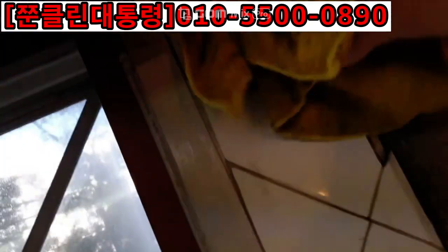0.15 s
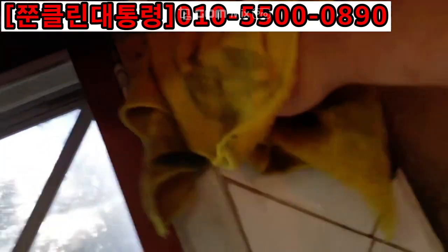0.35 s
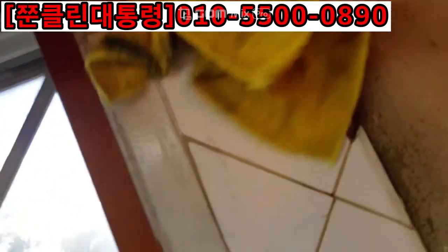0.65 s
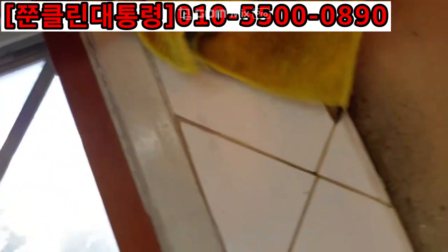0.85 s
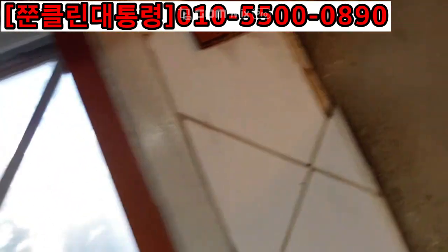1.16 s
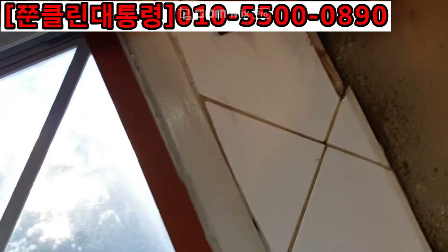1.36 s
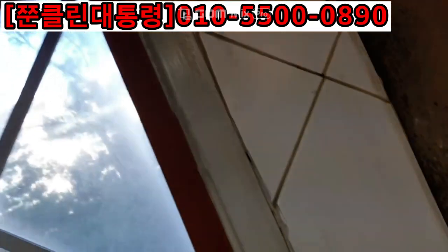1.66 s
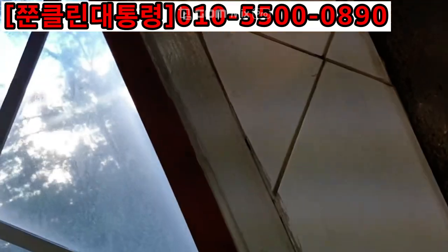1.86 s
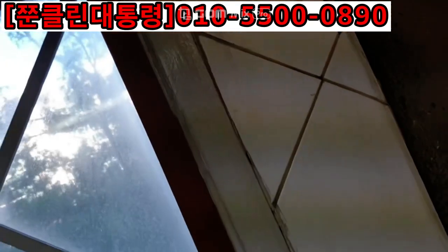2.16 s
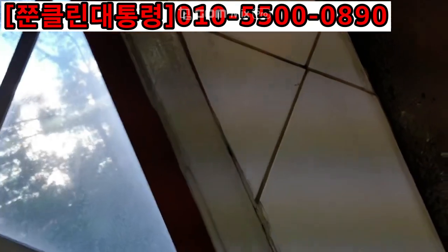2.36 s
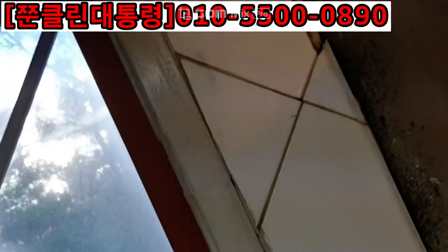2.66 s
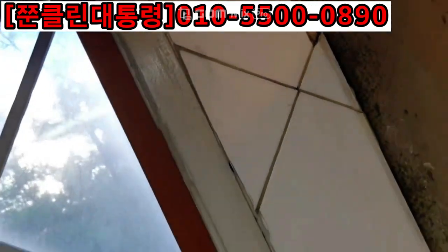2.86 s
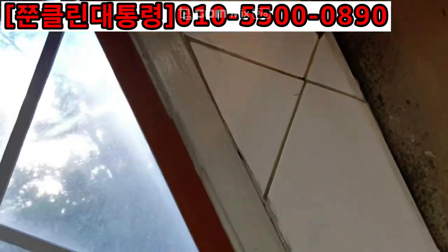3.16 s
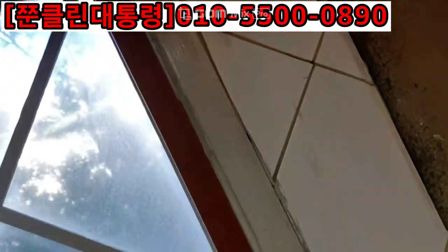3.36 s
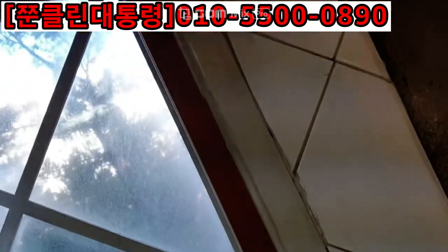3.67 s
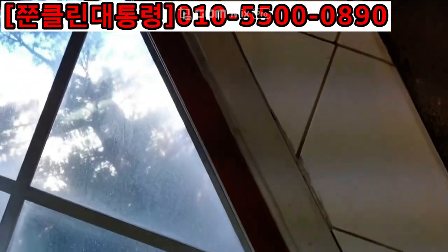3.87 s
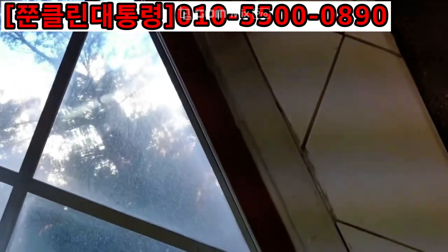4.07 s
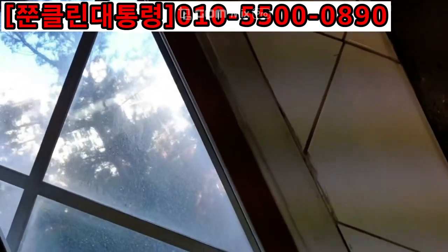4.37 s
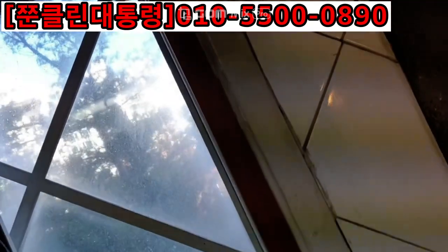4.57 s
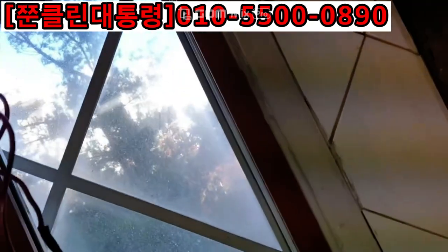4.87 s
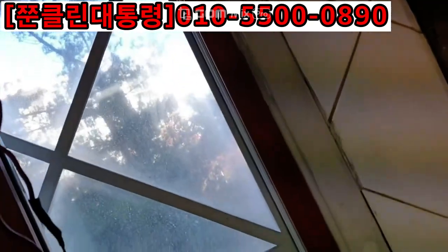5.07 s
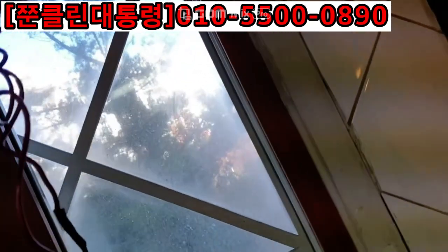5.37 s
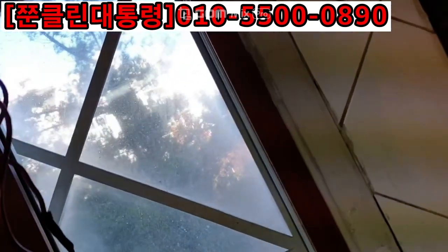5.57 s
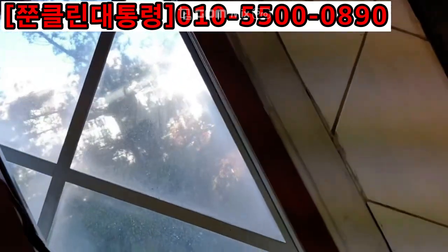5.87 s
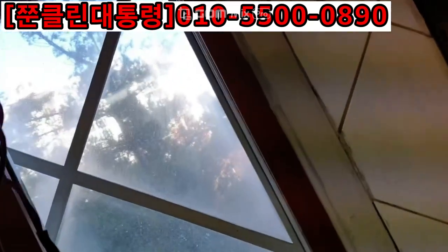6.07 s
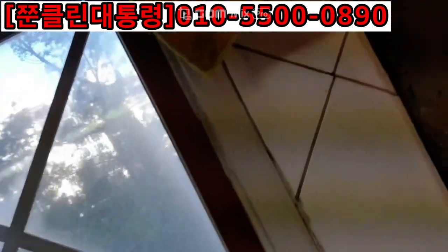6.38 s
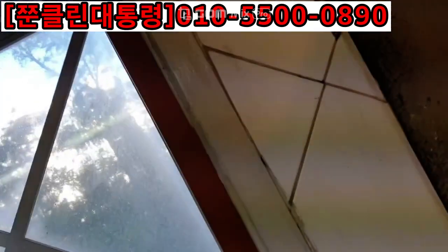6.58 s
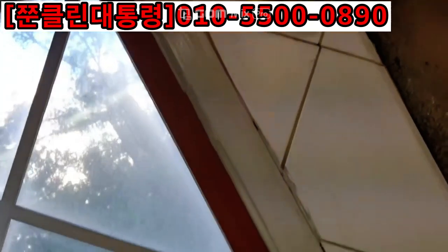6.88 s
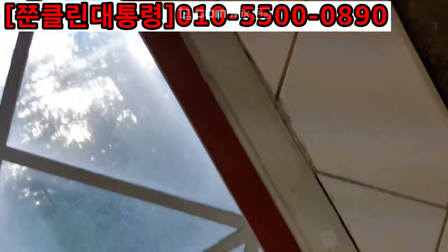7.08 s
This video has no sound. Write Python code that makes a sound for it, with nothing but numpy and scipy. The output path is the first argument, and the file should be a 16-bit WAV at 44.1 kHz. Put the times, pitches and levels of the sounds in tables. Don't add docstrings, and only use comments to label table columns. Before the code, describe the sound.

A damp rag rubs a greasy hard surface close to a phone microphone in a small tiled kitchen. From 0 to 2.6 s come short, uneven wipes, gritty fibre hiss with jerky slips, stronger around 1.0, 1.8 and 2.5 s. A brief rising squeak at 1.7 s drops back, soft knocks follow, and a hard bright click stands out at 1.87 s. Another small squeak comes near 2.45 s. From 2.7 to 3.2 s it is almost still. At 3.3 s a cloth fold flaps softly with knuckle bumps, and rapid heavier scrubbing runs to 5.6 s, with hollow dragging, knocks, ticks and a chirp at 4.25 s. A crisp cloth snap hits at 5.42 s. After 5.7 s only scattered faint dabs and muted bumps near 6.45, 6.75 and 6.9 s remain, with a last wipe at 7.1 s. Low room air and wavering street rumble continue underneath.

```python
import sys
import numpy as np
from scipy import signal
from scipy.fft import rfft, irfft, next_fast_len
from scipy.io import wavfile
from scipy.ndimage import uniform_filter1d, map_coordinates

SR = 44100
rng = np.random.default_rng(int(sys.argv[2]) if len(sys.argv) > 2 else 0)


def put_to_file(sound):
    columns = np.atleast_2d(sound).T
    safe = np.clip(columns, -1, 1)
    whole_steps = np.round(safe * 32767)
    wavfile.write(sys.argv[1], SR, whole_steps.astype(np.int16))


def ratio_of_db(decibels):
    return 10 ** (np.asarray(decibels, float) / 20)


N = 319431

# fastest moment
# in seconds, length in seconds, fibre hiss in dB, slips over hiss in dB, panel drag over hiss in dB.
WIPES = [(0.018, 0.18, -58, 6.5, 7), (0.284, 0.12, -59, 2, 0.5), (0.395, 0.088, -61.5, -5, -1.5),
         (0.6, 0.12, -65.5, -29, -8), (0.665, 0.093, -56.5, 0, -1), (0.788, 0.2, -60.5, 7, 7),
         (0.93, 0.078, -57.5, -11, -1), (1.03, 0.21, -46, 0.5, -13.5), (1.13, 0.19, -50, 0.5, -0.5),
         (1.19, 0.048, -60, 12.5, 9), (1.27, 0.2, -70, 1, 7.5), (1.33, 0.067, -57, -1, -6),
         (1.54, .2, -61, 3, -0.5), (1.68, .1, -60.5, 13, 13), (1.785, 0.22, -46, 4, -7.5),
         (1.86, 0.055, -49, 9.5, 3), (1.99, 0.075, -62.5, 5, 13.5), (2.135, 0.12, -57.5, -22, -4),
         (2.208, 0.089, -53, 5, 1), (2.4, 0.16, -55, 8, -22), (2.487, 0.18, -46, 6, 1.5),
         (2.61, 0.12, -54.5, 4, -5)]
SCRUBS = [(3.322, 0.07, -57.5, -6.5, 9.5), (3.39, 0.17, -52, 4.5, -8), (3.468, 0.1, -47.5, -3, 3.5),
          (3.601, 0.14, -56.5, -6, 5.5), (3.698, 0.17, -54.5, -1.5, -4), (3.864, .12, -54.5, 2, 7.5),
          (3.99, 0.25, -59, -0.5, 10), (4.119, 0.17, -76, -23, 4), (4.24, 0.088, -61.5, 11, 18),
          (4.299, 0.16, -53.5, 5.5, 2.5), (4.4, .05, -62.5, 14.5, 6), (4.431, 0.16, -54, 5.5, 8),
          (4.627, .11, -51.5, 8, 13.5), (4.708, 0.085, -55, 4.5, 11), (4.951, 0.082, -65, 3.5, 13),
          (5.02, 0.098, -73.5, -1, 26), (5.082, 0.076, -48.5, 10, 10), (5.153, 0.1, -50, 6, 11.5),
          (5.276, 0.05, -52.5, 9.5, 13.5), (5.37, 0.098, -56, 0, 8), (5.431, 0.041, -46.5, -2, 12.5),
          (5.502, 0.13, -51, 6.5, 8)]
DABS = [(2.76, 0.076, -68.5, -2, -6), (2.85, .15, -67, -5, 10), (3.0, 0.16, -75.5, 4, 13.5),
        (5.697, 0.16, -55.5, 6, 1.5), (5.899, 0.18, -53.5, 5.5, 5.5), (5.959, 0.11, -67, -3, 2),
        (6.08, 0.15, -73, 0, -1), (6.269, 0.13, -64, -12.5, 8), (6.371, 0.24, -65.5, -13, 6),
        (6.477, 0.074, -51, -3, 2.5), (6.609, 0.15, -67, 3, 4), (6.752, .12, -70.5, 12.5, 14),
        (6.85, 0.19, -71, -1, 7), (6.934, 0.088, -70, 16, 21), (7.074, 0.12, -52, -3, -5),
        (7.149, .1, -61.5, 0, 1.5)]
# frequency in Hz, level in dB per Hz.
FIBRES = [(880, -4), (1500, -5.5), (1760, -34), (2080, -2.5), (2930, -4.5), (5450, -2), (6910, -6.5),
          (13100, -4), (14900, -4.5), (15800, -48)]
SLIPS = [(250, -23), (450, -2), (700, 1.5), (1240, -2.5), (1500, -3.5), (2400, -9), (3500, -14.5),
         (6000, -26.5)]
DRAG = [(70, -43), (140, 1.5), (210, -4.5), (280, -1.5), (420, -2.5), (600, -9), (900, -36)]
# start in seconds, level in dB, rise in seconds, t60 in seconds.
FLICKS = [
    (3.328, -40.5, 0.0069, 0.17),
    (3.341, -31.5, 0.0011, 0.098),
    (3.36, -46, .004, 0.083),
    (5.417, -36, 0.0033, 0.059),
    (5.4234, -21.5, 0.00032, 0.019),
    (5.428, -33.5, 0.0017, 0.12),
    (5.444, -45, 0.0029, 0.085),
    (5.456, -36.5, 0.0018, 0.041),
]
# frequency in Hz, level in dB per Hz.
FOLD = [(590, 0), (1000, -6), (1590, -8), (1700, -5.5), (5100, -3.5), (7120, -11.5), (9730, -8),
        (14400, -15.5), (15800, -42)]
# start and end in seconds, first and last pitch in Hz, level in dB.
SQUEAKS = [
    (0.671, 0.732, 800, 810, -55),
    (1.301, 1.364, 1197, 1190, -67),
    (1.429, 1.656, 1240, 1232, -62),
    (1.722, 1.764, 754, 840, -37),
    (1.753, 1.814, 941, 910, -43),
    (2.429, 2.513, 1055, 1084, -45.5),
    (4.25, 4.301, 855, 958, -48.5),
    (6.39, 6.451, 645, 806, -60),
    (6.5, 6.7, 1240, 1240, -66.5),
]
# time in seconds, peak in dB, thud in dB, ring in Hz.
KNOCKS = [(0.686, -35.5, -24, 800), (1.729, -34, -8, 800), (1.852, -29, -6, 677), (1.882, -30.5, 5, 362),
          (1.894, -31, 0, 345), (3.344, -26, -42, 512), (3.351, -32, -10, 574), (3.434, -31, -25, 663),
          (3.709, -40, -30, 680), (3.741, -40.5, -7, 372), (3.817, -42, -18, 402), (3.844, -46, -7, 460),
          (3.869, -33, -32, 388), (4.217, -33, -9, 564), (4.42, -31, -32, 662), (4.509, -41, 1, 373),
          (4.608, -30, -30, 563), (4.982, -37, 3.5, 487), (5.094, -31.5, -16, 420),
          (5.346, -39.5, 0.5, 650), (5.432, -40, -18, 338), (5.446, -39, -27, 410), (5.677, -41.5, -1, 630),
          (6.448, -37, -2, 380), (6.474, -37, -5.5, 376), (6.741, -37.5, -8, 535),
          (6.918, -34.5, -4.5, 610)]
# time in seconds, peak in dB, thud in dB, ring in Hz.
TICKS = [
    (1.145, -42, -32, 385),
    (1.871, -17.5, -22, 590),
    (2.404, -47, -29, 806),
    (2.479, -31, -28, 1090),
    (4.361, -31, -17, 406),
    (5.077, -30.5, -27, 930),
    (5.235, -32.5, -19, 413),
    (5.275, -37, -26, 352),
    (5.422, -40, -11, 397),
    (5.458, -45, -23, 514),
]
# frequency in Hz, level in dB, t60 in seconds.
COUNTER = [(405, -2, 0.017), (554, 1.5, 0.066), (713, -2.5, 0.054), (967, -10, 0.16), (1240, -6.5, 0.15),
           (1850, -12, 0.054), (1914, 4.5, 0.043)]
PANEL = [(141.3, 0, 0.27), (185, 2, 0.072), (273, -12.5, 0.13)]
# frequency in Hz, t60 in seconds.
TILES = [(150, 0.2), (1000, 0.14), (4000, 0.071), (12000, 0.056)]
# frequency in Hz, correlation from -1 to 1.
ALIKE = [(60, 0.76), (150, 0.78), (380, 0.72), (950, 0.38), (2380, 0.08), (5980, -0.02), (15000, 0.01)]
# time in seconds, rumble in dB.
STREET = [(0.0, -70), (0.12, -56), (1.35, -57), (1.53, -63), (1.93, -50.5), (2.06, -58.5), (2.52, -55.5),
          (3.25, -63), (3.39, -56), (3.75, -59), (4.36, -53), (4.9, -57.5), (4.98, -49), (5.3, -61.5),
          (6.53, -52.5), (6.66, -61.5), (7.02, -51.5), (7.24, -51.5)]
# frequency in Hz, level in dB per Hz.
RUMBLE = [(12, -64), (20, -35), (54, -0.5), (92, -3.5), (140, -12.5), (180, -34), (310, -120)]
AIR = [(71, -47), (120, -16), (193, -0.5), (241, -7), (279, 0.5), (333, -16), (416, -7), (750, -35),
       (980, -67), (1650, -120)]
HUSH = [(440, -41), (750, 4), (980, -14), (1060, -9.5), (6230, -14.5), (7450, -16.5), (8900, -16),
        (15800, -14)]

WIPE_RISE, SCRUB_RISE, DAB_RISE = 0.43, 0.38, 0.41
EDGE_DB, TAPER = 10, 1.385
SLIP_LINGER, DRAG_LINGER = 0.97, 1.28
SLIP_HZ, OCTAVES_PER_DB, SLOWEST_HZ = 737, -1.74, 595
KNUCKLE_TICK_DB, KNUCKLE_T60_S = -8, 0.052
NAIL_TICK_DB, NAIL_T60_S = 3.5, 0.02
AIR_DB, HUSH_DB = -63.5, -73


def unit(x):
    return x / np.sqrt(np.mean(x ** 2) + 1e-20)


def along(points, hz):
    f, v = np.transpose(points)
    return np.interp(np.log(hz + 1), np.log(f + 1), v)


def noise():
    return rng.standard_normal((2, N))


def wobble(rate):
    knots = rng.standard_normal(int(N * 80 / SR))
    return map_coordinates(knots, [np.arange(N) * rate / SR])


def reshaped(x, gain, size=512):
    hz, t, z = signal.stft(x, SR, nperseg=size)
    return signal.istft(z * gain(hz[:, None], t), SR, nperseg=size)[1][..., :N]


def patchy(x, depth_db, size=512, bins=5, frames=10):
    def field(hz, t):
        grain = rng.standard_normal((len(hz), len(t)))
        blur = uniform_filter1d(grain, size=bins, axis=0)
        blur = uniform_filter1d(blur, size=frames, axis=1)
        return ratio_of_db(depth_db * unit(blur))
    return reshaped(x, field, size=size)


def spread(pair, spectrum):
    m = next_fast_len(N + 8192)
    hz = np.fft.rfftfreq(m, 1 / SR)
    turn = np.arccos(np.clip(along(ALIKE, hz), -1, 1)) / 2
    colour = ratio_of_db(along(spectrum, hz))
    mid, side = irfft(rfft(pair, m) * colour * [np.cos(turn), np.sin(turn)], m)[:, :N]
    return unit(np.array([mid + side, mid - side]))


def rag():
    hiss_db, slip_db, drag_db, pitch_hz = strokes()
    grip = wobble(25)
    fibres = jerks(1500, spread_db=4.0, smooth=1.6) * ratio_of_db(0.89 * wobble(70))
    hiss = spread(patchy(fibres, depth_db=2.5), FIBRES)
    even = np.clip((pitch_hz - 600) / 150, 0.8, 1.5)

    def squeak(hz, t):
        at = (t * SR).astype(int).clip(0, N - 1)
        bumps = sum(np.exp(-((hz - k * pitch_hz[at]) / 70) ** 2) * 0.63 ** k for k in (1, 2, 3))
        return (1 + even[at] * bumps) / np.sqrt(1 + 0.043 * even[at] ** 2)

    slips = spread(reshaped(jerks(400, spread_db=0.5, smooth=1.0), squeak, size=1024), SLIPS)
    drag = spread(jerks(120, spread_db=3.0, smooth=1.16), DRAG)
    rub = hiss * ratio_of_db(4.0 + 0.89 * grip)
    rub = rub + slips * ratio_of_db(slip_db - 0.4 + 1.6 * grip)
    rub = rub + drag * ratio_of_db(drag_db - 0.9 + 1.0 * grip)
    return ratio_of_db(hiss_db - 1.06) * patchy(rub, depth_db=3.5, size=2048, bins=2, frames=4)


def strokes():
    t = np.arange(0, N + 64, 64) / SR
    power = np.full((3, 1), 1e-11)
    linger = [[1], [SLIP_LINGER], [DRAG_LINGER]]
    for rows, rise in ((WIPES, WIPE_RISE), (SCRUBS, SCRUB_RISE), (DABS, DAB_RISE)):
        for s, length, level_db, slip_db, drag_db in rows:
            reach = np.where(t < s, (s - t) / rise, (t - s) / (1 - rise)) / length
            fade_db = EDGE_DB * (reach / linger) ** TAPER
            power = power + ratio_of_db(level_db + np.c_[[0, slip_db, drag_db]] - fade_db) ** 2
    hiss_db, slip_db, drag_db = [np.interp(np.arange(N) / SR, t, 10 * np.log10(p)) for p in power]
    pitch_hz = np.maximum(SLIP_HZ * 2 ** (OCTAVES_PER_DB * (hiss_db - drag_db)), SLOWEST_HZ)
    return hiss_db, slip_db - hiss_db, drag_db - hiss_db, pitch_hz


def jerks(per_s, spread_db, smooth):
    released = rng.random(N) < per_s / SR
    size = ratio_of_db(spread_db * rng.standard_normal(N).clip(-2, 2))
    train = unit(released * size * np.sign(rng.standard_normal(N)))
    blur = rng.standard_normal(600) * ratio_of_db(-60 * np.arange(600) / SR / 0.0094)
    smeared = unit(signal.fftconvolve(train, blur)[:N])
    return np.array([train, smeared]) + smooth * noise()


def flicks():
    t = np.arange(SR // 4) / SR
    level = np.zeros(N + SR)
    for s, db, rise, t60 in FLICKS:
        level[round(s * SR):][:len(t)] += ratio_of_db(db - 60 * t / t60) * (1 - np.exp(-t / rise))
    return level[:N] * spread(noise(), FOLD)


def squeaks():
    out, waver, swell = np.zeros(N), wobble(70), wobble(110)
    for start, end, first_hz, last_hz, db in SQUEAKS:
        part = slice(round(start * SR), round(end * SR))
        u = np.linspace(0, 1, part.stop - part.start)
        hz = (first_hz + (last_hz - first_hz) * u) * (1 + 0.035 * waver[part])
        turn = 2 * np.pi * np.cumsum(hz) / SR
        tone = np.sin(turn) + 0.12 * np.sin(2 * turn) + 0.06 * np.sin(3 * turn)
        out[part] += ratio_of_db(db + 3 + 4.5 * swell[part]) * np.sin(np.pi * u) ** 0.8 * tone
    return out


def knocks():
    out, t = np.zeros(N + SR), np.arange(SR // 4) / SR
    delay_s = 0.0018
    tick = ratio_of_db(-60 * t / 0.009) * np.sin(2 * np.pi * 1150 * t)
    kinds = ((KNOCKS, KNUCKLE_TICK_DB, KNUCKLE_T60_S), (TICKS, NAIL_TICK_DB, NAIL_T60_S))
    for rows, tick_db, t60 in kinds:
        for s, db, thud_db, hz in rows:
            spot = ratio_of_db(-60 * t / t60) * np.sin(2 * np.pi * hz * t)
            spot = spot + 0.5 * ring(COUNTER, t, hz, 0.048 / t60)
            blow = spot * (1 - np.exp(-t / 0.00044)) + ratio_of_db(tick_db) * tick
            thud = ring(PANEL, t) * (1 - np.exp(-t / 0.0052))
            hit = blow / abs(blow).max() + ratio_of_db(thud_db + 1.0) * thud
            out[round((s + delay_s) * SR):][:len(t)] += ratio_of_db(db + 0.21 * tick_db) * hit
    return out[:N]


def ring(modes, t, near_hz=None, damping=1):
    hz, db, t60 = np.transpose(modes)[:, :, None]
    luck = rng.normal(0, 2.7, hz.shape)
    tilt = 0 if near_hz is None else -7 * abs(np.log2(hz / near_hz))
    decay = ratio_of_db(db + luck + tilt - 60 * damping * t / t60)
    return np.sum(decay * np.sin(2 * np.pi * hz * t), axis=0)


def tiles(x):
    hz, t, z = signal.stft(rng.standard_normal((2, SR // 3)), SR, nperseg=256)
    tail = signal.istft(z * ratio_of_db(-60 * t / along(TILES, hz)[:, None]), SR, nperseg=256)[1]
    late = np.pad(x, (130, 0))
    return signal.fftconvolve(late[None], tail / np.linalg.norm(tail[0]), axes=1)[:, :N]


def kitchen():
    s, db = np.transpose(STREET)
    street_db = np.interp(np.arange(N) / SR, s, db) + 1.7 * wobble(9)
    rumble = ratio_of_db(street_db + [[0.7], [-0.7]]) * spread(noise(), RUMBLE)
    air = ratio_of_db(AIR_DB - 0.5) * spread(noise(), AIR)
    hush = ratio_of_db(HUSH_DB + 3.0) * spread(patchy(noise(), depth_db=2.0), HUSH)
    return rumble + air + hush


def scene():
    hits = knocks() + squeaks()
    return rag() + flicks() + ratio_of_db(-1.0) * hits + ratio_of_db(-6.0) * tiles(hits) + kitchen()


def top_cut(x):
    return signal.sosfilt(signal.butter(12, 16320, fs=SR, output="sos"), x)


def record(dry):
    passed = np.fft.rfftfreq(N, 1 / SR) < 15750
    kept = irfft(rfft(dry) * passed, N)
    return top_cut(kept)


dry = scene()
out = record(dry)
put_to_file(out)
```